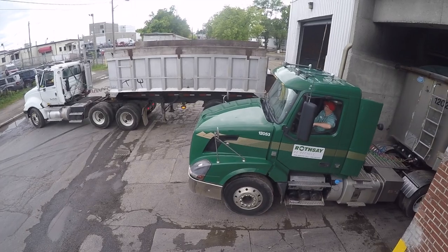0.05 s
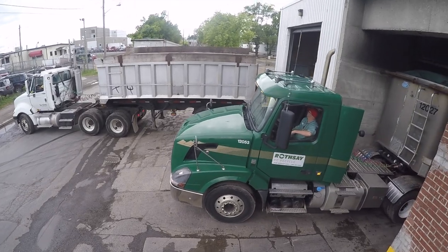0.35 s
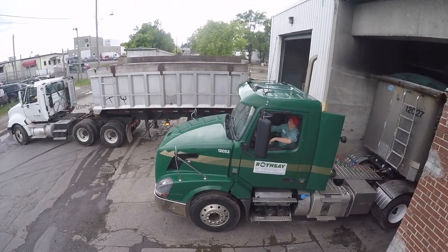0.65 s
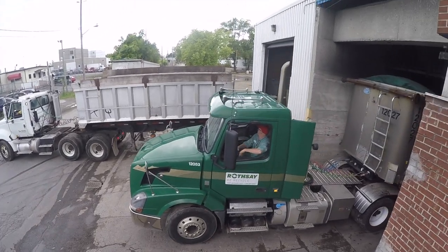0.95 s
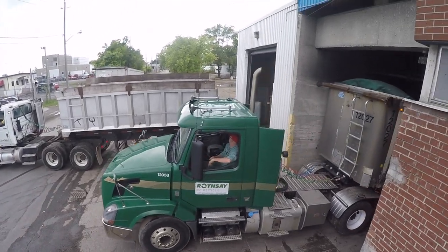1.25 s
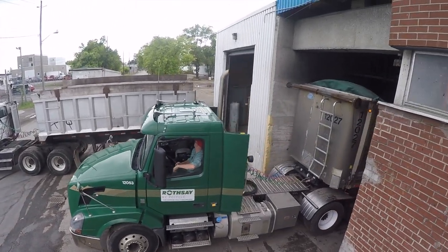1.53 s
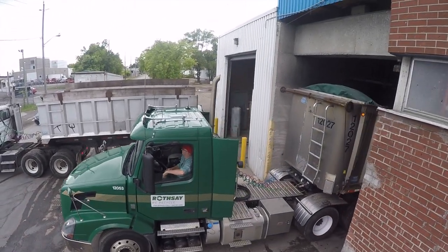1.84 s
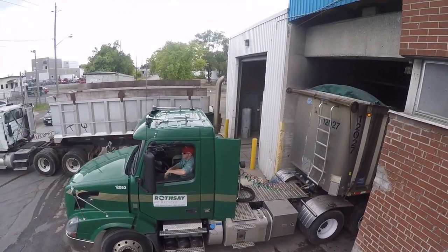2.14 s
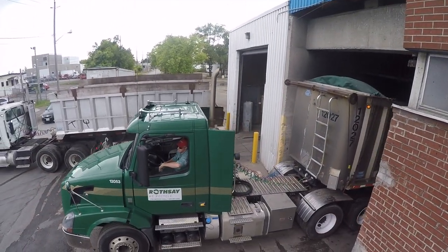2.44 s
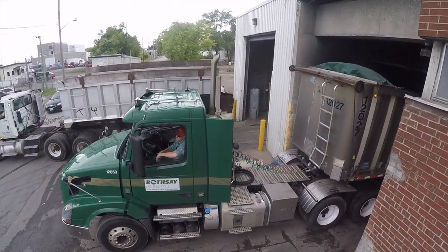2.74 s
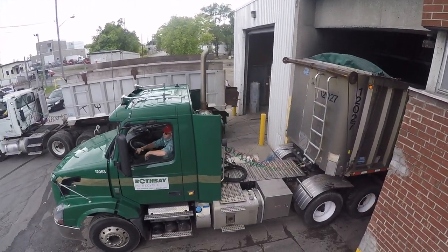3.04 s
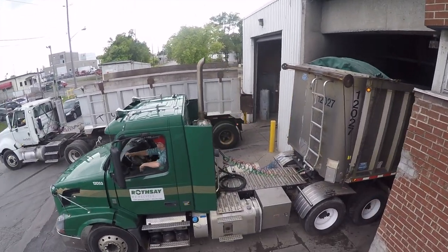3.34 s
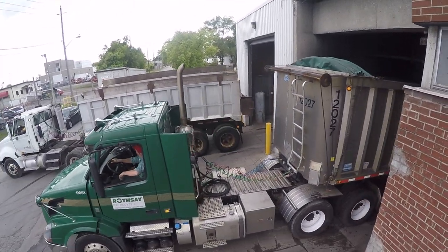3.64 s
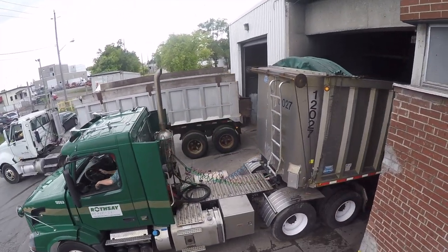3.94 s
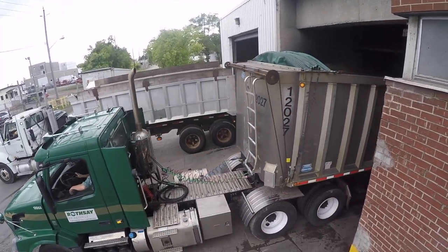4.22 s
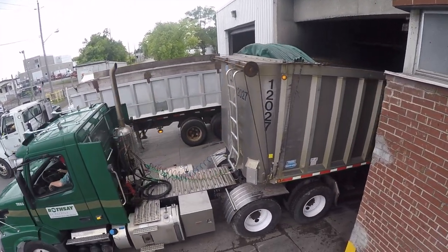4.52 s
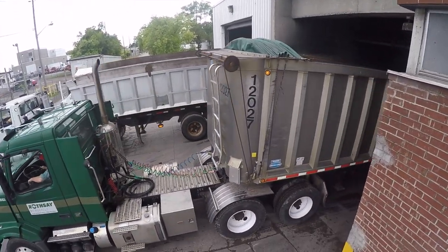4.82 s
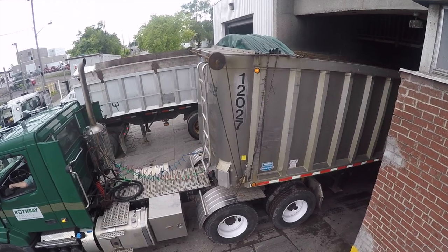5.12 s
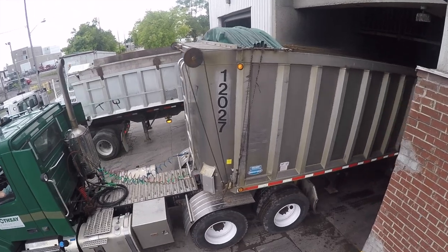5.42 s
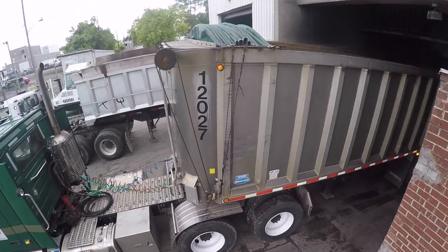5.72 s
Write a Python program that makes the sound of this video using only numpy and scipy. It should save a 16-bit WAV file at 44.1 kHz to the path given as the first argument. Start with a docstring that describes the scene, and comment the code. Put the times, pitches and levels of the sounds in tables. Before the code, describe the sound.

A heavy truck creeps out of a loading bay, heard from close by. Air hisses briefly over the rumbling, clattering diesel and a brake chatters. The dragging brakes then scrape and break into rough, wavering squeals with a short echo off the yard walls. A soft low thump and one hard knock come midway, followed by more chatter and squeals. These drop to a creak and grind before a last hiss of air as the engine swells.

```python
"""A heavy truck creeps out of a loading bay. Air hisses over the rumbling, clattering diesel, and a
brake shoe chatters. From 1 s the dragging brakes scrape, then stick and slip into rough, wavering
squeals that the yard walls throw back. A soft low thump comes, like a buffet of wind, then a hard
knock near 3 s; chatter and squeals return. From 4.5 s the brakes drop to a creak and a grind over the
humming drive line, and a last hiss of air comes as the engine swells."""
import sys
import numpy as np
from scipy import signal
from scipy.fft import rfft, irfft
from scipy.io import wavfile
from scipy.ndimage import uniform_filter1d

SR = 44100
rng = np.random.default_rng(int(sys.argv[2]) if len(sys.argv) > 2 else 0)


def store_wav(level_fs):
    """Save 16-bit WAV to argv[1]."""
    pcm = np.round(np.clip(np.atleast_2d(level_fs), -1, 1) * 32767)
    wavfile.write(sys.argv[1], SR, pcm.T.astype(np.int16))


N = 263277
TIME = np.arange(N) / SR
BINS = np.fft.rfftfreq(N, 1 / SR)
FIRING_HZ, TOP_HZ = 28.09, 15350  # the diesel's pulse; the high cut of the mix


def amp(db):
    """Decibels to gain."""
    return 10 ** (np.asarray(db) / 20)


def unit(x):
    """Scales to rms 1."""
    return x / np.sqrt(np.mean(x ** 2) + 1e-20)


def curves(rows):
    """One automation curve for each column after the time, in straight ramps."""
    times, *columns = np.transpose(rows)
    return [np.interp(TIME, times, column) for column in columns]


def noise(gain):
    """Noise of rms 1 with the given gain in each bin."""
    return unit(irfft(rfft(rng.standard_normal(N)) * gain, N))


def eq_noise(points):
    """Noise of rms 1 shaped by an EQ curve."""
    hz, db = np.transpose(points)
    return noise(amp(np.interp(np.log(BINS + 1), np.log(hz + 1), db)))


def drift(hz):
    """Random modulation of rms 1, rolling off above the given rate."""
    return noise(1 / (1 + (BINS / hz) ** 4))


def band(hz, width):
    """Noise ringing in one resonance."""
    return noise(1 / (1 + ((BINS - hz) / (0.55 * width)) ** 2))


def throb(hz, depth_db, wander):
    """Gain that jumps and dies away once a cycle, uneven in rate and depth."""
    turns = np.cumsum(hz * (1 + wander * drift(5.7))) / SR
    saw = uniform_filter1d(.5 - turns % 1, size=350)
    return unit(amp(depth_db * saw * (1 + .4 * drift(12))))


# the diesel's low bed, swelling as it pulls: t/s, level/dB
RUMBLE_LEVEL = [(0, -32), (.55, -32.5), (.8, -33.5), (1.2, -32), (1.8, -30), (2.2, -31), (2.65, -30.5),
                (2.9, -26.5), (3.25, -33), (3.65, -32), (4.4, -34.5), (4.95, -36), (5.25, -31),
                (5.5, -30.5), (5.68, -26), (5.97, -32.5)]
# its EQ, heavy in the sub bass: f/Hz, level/dB
RUMBLE_EQ = [(7.1, -30), (12, 2.5), (30, 4.5), (56, -2), (73, -6.5), (140, -29), (182, -24.5), (287, -39.5),
             (330, -52), (430, -100), (730, -120)]
def rumble(trim_db):
    """The deep rumble of the diesel pulling."""
    return amp(curves(RUMBLE_LEVEL)[0] + trim_db) * eq_noise(RUMBLE_EQ)


# exhaust tones: multiple of the firing rate, level/dB
EXHAUST_ORDERS = [(1, -45.5), (2, -39), (3.4, -54.5), (6.3, -65.5)]
def exhaust():
    """The slow-running diesel throbs at multiples of its firing rate."""
    turns = np.cumsum(FIRING_HZ * (1 + .06 * drift(4))) / SR
    return np.sqrt(2) * sum(amp(db + 2 * drift(2.7)) * np.sin(2 * np.pi * (order * turns + rng.random()))
                            for order, db in EXHAUST_ORDERS)


# roar of the block as the cab passes: t/s, level/dB
ROAR_LEVEL = [(0.06, -54.5), (0.32, -50), (1.34, -53), (1.82, -50.5), (3.2, -49), (4.65, -51), (5.18, -46),
              (5.48, -50), (5.97, -48)]
# its midrange EQ: f/Hz, level/dB
ROAR_EQ = [(160, -1), (270, -4), (313, -5), (355, -4.5), (442, -5), (594, -4.5), (674, -5.5), (1050, 1.5),
           (1310, -10.5), (1450, -3), (1880, -5), (3190, -120)]
def roar(trim_db):
    """The engine block's roar gives the diesel its body."""
    return amp(curves(ROAR_LEVEL)[0] + trim_db) * eq_noise(ROAR_EQ)


# clatter of the diesel as the cab passes: t/s, level/dB
CLATTER_RIDE = [(0, -44), (.33, -41.5), (1.0, -45.5), (1.9, -45.5), (2.25, -36), (2.45, -43.5), (2.7, -38),
                (3.3, -41), (4.45, -45), (5.25, -35), (5.45, -42), (5.97, -41)]
# its hard, bright EQ: f/Hz, level/dB
CLATTER_EQ = [(710, -68), (1200, -11), (1320, -22), (1790, -2), (2150, -6), (2490, 3), (2920, -11.5),
              (3800, -2.5), (4450, -35), (4890, -34), (5270, -29.5), (6940, -23.5), (8390, -41),
              (11200, -50), (15000, -40)]
# steady ringing of the metalwork: f/Hz, width/Hz, level/dB
METAL_RINGS = [(1054, 150, -68.5), (2672, 50, -59), (4770, 8.4, -60), (7000, 55, -85.5)]
def clatter():
    """The diesel's metallic edge: bright noise and ringing metalwork."""
    rattle = amp(curves(CLATTER_RIDE)[0]) * eq_noise(CLATTER_EQ)
    return rattle + sum(amp(db) * band(hz, width) for hz, width, db in METAL_RINGS)


# hum of the drive line: t/s, f/Hz, level/dB
DRIVE_HUM = [(4.3, 343.5, -79), (4.6, 340, -65), (4.8, 351, -55.5), (5.05, 357, -60.5), (5.25, 364, -48),
             (5.4, 360, -74), (5.7, 351, -74), (5.85, 346, -52.5), (5.97, 347, -49)]
def drive_line():
    """The drive line under load sings one wavering tone."""
    hz, db = curves(DRIVE_HUM)
    level = amp(db + 2.7 * drift(12.5))
    turns = np.cumsum(hz * (1 + 0.022 * drift(25.6))) / SR
    return np.sqrt(2) * level * np.sin(2 * np.pi * turns)


# puffs of air at the head and tail: t/s, hiss level/dB, whistle level/dB
AIR_LEVELS = [(0, -43, -59), (.2, -60, -55), (.32, -59, -75.5), (5.58, -68, -66.5), (5.64, -43, -60.5),
              (5.97, -48.5, -62)]
# EQ of the hiss: f/Hz, level/dB
HISS_EQ = [(2000, -1), (4000, 9.5), (6800, 2.5), (8800, -17), (11500, -15), (15000, -22)]
def air():
    """Compressed air escapes from the brake system: a hiss with a thin, breathy top."""
    hiss_db, whistle_db = curves(AIR_LEVELS)
    return amp(hiss_db) * eq_noise(HISS_EQ) + amp(whistle_db) * band(hz=10800, width=3500)


# lurches of the truck: t/s, level/dB
LURCHES = [(.225, -47), (1.62, -47), (3.14, -44), (3.25, -52), (3.86, -43.5), (4.27, -48), (5.64, -42.5)]
# EQ of the bodywork: f/Hz, level/dB
PANEL_EQ = [(150, -25), (330, -8), (700, -3), (1050, 2.5), (1310, -6), (1800, -9), (3200, -40)]
def shudders(rise_s, t60):
    """Each lurch shakes the panels into a short dull rattle."""
    shake = np.zeros(N)
    for start, db in LURCHES:
        t = np.maximum(TIME - start, 0)
        shake += np.minimum(t / rise_s, 1) * amp(db - 60 * np.maximum(t - rise_s, 0) / t60)
    return shake * eq_noise(PANEL_EQ)


# a soft low thump, then three modes that make one knock: t/s, f/Hz, t60/s, level/dB
THUMP_AND_KNOCK_MODES = [(2.325, 82.3, 0.15, -17), (2.974, 784, 0.014, -22), (2.976, 603, 0.014, -18.5),
                         (2.981, 81.5, 0.054, -10)]
def thump_and_knock():
    """A thump like a buffet of wind, then the trailer's one hard knock, all quickly damped rings."""
    out = np.zeros(N)
    for start, hz, t60, db in THUMP_AND_KNOCK_MODES:
        t = np.maximum(TIME - start, 0)
        attack = 1 - np.exp(-t * hz)
        out += attack * amp(db - 60 * t / t60) * np.sin(2 * np.pi * hz * t)
    return out


# light drag of the linings between grabs: t/s, level/dB
LINING_DRAG = [(0, -40), (.3, -44), (.7, -49), (3.1, -48.5), (5.97, -46)]
# the linings grab and let go: t/s, length/s, attack/s, release/s, level/dB
LINING_GRABS = [(1.376, 0.44, 0.17, 0.16, -37.5), (1.867, 0.48, 0.085, 0.1, -36),
                (2.07, .21, 0.06, .11, -33.5), (2.2, 0.67, 0.079, 0.48, -40.5),
                (3.17, 0.61, 0.25, 0.23, -39), (3.597, .85, 0.32, 0.2, -36.5),
                (4.477, 0.93, 0.2, 0.069, -35), (5.04, 0.24, 0.063, 0.067, -32.5),
                (5.578, 0.94, .09, 0.41, -40)]
# EQ of the scrape: f/Hz, level/dB
SCRAPE_EQ = [(710, -23), (1200, -15), (1330, -33), (1830, -11.5), (1990, -6), (2460, -12), (2880, -7.5),
             (3420, 2.5), (4310, -3), (4790, -6.5), (5210, -4.5), (6110, -13.5), (7710, -20.5), (9620, -30),
             (15000, -35)]
def scrape(trim_db):
    """Dense tiny slips of the linings, in clumps, swelling with each grab."""
    power = amp(curves(LINING_DRAG)[0]) ** 2
    for start, length, attack, release, db in LINING_GRABS:
        ramps = np.minimum((TIME - start) / attack, (start + length - TIME) / release)
        power += (amp(db) * np.clip(ramps, 0, 1)) ** 2
    clumps = unit(amp(.8 * drift(400) + 1.7 * drift(20)))
    return amp(trim_db) * np.sqrt(power) * clumps * eq_noise(SCRAPE_EQ)


# judder of a brake shoe: t/s, ring level/dB, grit level/dB
JUDDER_LEVELS = [(.22, -66, -80), (.24, -39.5, -57), (.45, -44.5, -60.5), (.62, -44, -63), (.8, -55, -68),
                 (1.05, -79, -67), (1.2, -86, -53), (3.12, -75, -97), (3.135, -43.5, -50.5),
                 (3.4, -43, -61), (3.55, -67.5, -67)]
# resonances of the shoe: f/Hz, width/Hz, relative level/dB
SHOE_MODES = [(4120, 480, 5.5), (6480, 270, -9.5), (7900, 400, -20)]
def chatter():
    """A shoe shaken by the engine rubs in quick bursts."""
    ring_db, grit_db = curves(JUDDER_LEVELS)
    ring = unit(sum(amp(db) * band(hz, width) for hz, width, db in SHOE_MODES))
    bursts = throb(FIRING_HZ, depth_db=14, wander=.08)
    return bursts * (amp(ring_db) * ring + amp(grit_db) * band(hz=6600, width=4500))


# harsh accents from the brakes: t/s, length/s, f/Hz, width/Hz, level/dB
BRAKE_CATCHES = [(1.505, .05, 3060, 200, -39), (1.535, 0.13, 2660, 200, -40), (2.23, 0.063, 1740, 250, -44),
                 (3.129, 0.074, 4640, 300, -33.5), (3.971, 0.053, 1846, 120, -41),
                 (3.987, 0.022, 4550, 300, -37), (4.142, 0.022, 4834, 700, -28.5),
                 (4.204, 0.047, 4750, 220, -33), (4.214, 0.053, 1900, 100, -42.5)]
def catches():
    """The brakes catch in brief screeches too rough to hold a pitch."""
    out = np.zeros(N)
    for start, length, hz, width, db in BRAKE_CATCHES:
        envelope = np.interp(TIME - start, [0, .006, length * 0.79, length], [0.026, 1, 1, 0])
        out += amp(db) * envelope * band(hz, width)
    return out


def yard(x, t60, wet_db):
    """Sparse echoes from ground, trailer and walls."""
    t = np.arange(SR // 2) / SR
    taps = rng.standard_normal(len(t)) * (rng.random(len(t)) < 1500 / SR)  # about 1500 echoes a second
    taps *= (t > .003) * amp(-60 * t / t60)
    echoes = signal.fftconvolve(x, taps / np.linalg.norm(taps))[:N]
    return (x + amp(wet_db) * echoes) / np.sqrt(1 + amp(2 * wet_db))


# resonances of the brake drum: f/Hz, width/Hz, send level/dB
DRUM_MODES = [(2583, 32, 9.5), (3720, 14, -23), (4727, 88, 2), (7310, 29, 2.5), (7700, 36, -3),
              (11440, 100, -7)]
def drum(x):
    """The drum rings on at its own modes when the rubbing passes them."""
    return x + sum(amp(db) * signal.lfilter(*signal.iirpeak(hz, hz / width, fs=SR), x)
                   for hz, width, db in DRUM_MODES)


# squeal timbres by name: rasp share (held to 0.05-0.9), relative level/dB of partials 1 to 6
BRAKE_VOICES = { "whistle": (0.26, 0.5, -1, -11.5, -20, -21, -27),
                "hollow": (0.2, -3.5, 0, -12, -19.5, -35.5, -36.5),
                "screech": (0.1, -18, -13, 3.5, 0, -15, -17), "shriek": (0.8, -17, 1.5, 4.5, -31, -24, -42),
                "bright": (.28, 2, 1, -7, -16, -27, -25), "octave": (-0.2, -22, 13, -14, -20, -25, -22),
                "hoarse": (1, 4.5, 0, -15, -22, -32, -34), "piercing": (-0.1, 5.5, -5, -12, -29, -26, -28),
                "pure": (-0.1, 3, -15, -32, -29, -40, -40), "creak": (0.8, -26, -11.5, 8, -1.5, -13.5, -23),
                "grind": (.9, -14, -6, -3, 1, -28, -26), }
def stick_slip(hz, voice):
    """A lining sticks and slips along a pitch curve: trembling partials, each in a skirt of rasp."""
    count = len(hz)
    rasp, *partials_db = BRAKE_VOICES[voice]
    rasp = np.clip(rasp, .05, .9)
    hops = np.tanh(4 * drift(28)[:count])  # the pitch hops between neighbouring modes
    tremble = .0075 * drift(500)[:count] + .006 * drift(90)[:count] + .01 * hops
    turns = np.cumsum(hz * (1 + tremble)) / SR
    upper_db = partials_db[-1] - 5.5 * np.arange(1, 4)  # partials 7 to 9 roll off
    partials = amp(np.r_[partials_db, upper_db])
    # uneven grip shakes the size and timing of every partial; the high ones come and go
    skirt = signal.hilbert(noise(1 / (1 + (BINS / 170) ** 2)))
    patches = drift(23.5)
    stack = np.zeros(count)
    for k, gain in enumerate(partials / np.linalg.norm(partials), 1):
        above, below, patch = (np.roll(v, rng.integers(N))[:count] for v in (skirt, skirt, patches))
        grip = np.sqrt(1 - rasp) + np.sqrt(rasp) * (above + below.conj()) / 2
        flicker = unit(amp(patch * np.minimum(k * hz / 1900, 6)))
        tone = (grip * np.exp(2j * np.pi * k * turns)).real
        stack += gain * flicker * (k * hz < TOP_HZ) * tone
    return np.sqrt(2) * stack


# squeal cues: t/s, length/s, crest as share of length, level/dB, first, middle and last f/Hz, voice
SQUEAL_CUES = [ (1.09, 0.15, 0.59, -43.5, 2350, 2353, 2577, "whistle"),
               (1.19, 0.22, 0.65, -34, 2570, 2428, 2112, "whistle"),
               (1.39, .13, .6, -33.5, 2450, 2430, 2606, "whistle"),
               (1.495, 0.098, .3, -40.5, 3120, 2924, 2740, "whistle"),
               (1.56, 0.092, 0.76, -51, 2850, 2770, 2660, "whistle"),
               (1.55, 0.12, 0.51, -35.5, 2020, 1887, 1796, "hollow"),
               (1.915, .12, 0.39, -31.5, 1164, 1197, 1277, "screech"),
               (2.0, 0.1, 0.69, -32.5, 1240, 1287, 1302, "screech"),
               (2.07, .22, .36, -29.5, 1652, 1650, 1865, "shriek"),
               (2.25, .21, 0.44, -35, 1810, 2107, 2247, "bright"),
               (2.43, 0.29, 0.21, -39, 2250, 2320, 2330, "bright"),
               (2.31, 0.093, 0.71, -41, 1520, 1530, 1630, "octave"),
               (2.43, 0.11, 0.57, -35, 1750, 1816, 1783, "octave"),
               (3.17, 0.31, 0.42, -38.5, 2330, 2205, 1998, "hoarse"),
               (3.46, .11, 0.38, -35.5, 2086, 2000, 1968, "hollow"),
               (3.55, .24, 0.53, -33, 1973, 1999, 1763, "hollow"),
               (3.73, .17, 0.11, -36.5, 1900, 1762, 1704, "hollow"),
               (3.961, .125, 0.32, -30.5, 2750, 2600, 2480, "octave"),
               (4.035, 0.1264, 0.54, -33, 2570, 2630, 2480, "piercing"),
               (4.081, 0.21, 0.21, -34, 3387, 3277, 3266, "pure"),
               (4.195, 0.0655, 0.38, -33, 2430, 2380, 2310, "octave"),
               (4.55, .26, 0.82, -29.5, 1091, 1140, 1212, "creak"),
               (4.79, .26, 0.28, -37, 1193, 1240, 1222, "grind"),
               (5.06, 0.142, 0.31, -30.5, 1175, 1182, 1180, "grind"),
               (5.16, .21, .45, -32.5, 1195, 1199, 1208, "grind"), ]
def squeals(swell_db):
    """The brakes sing out: each squeal glides on one arc, swells to its crest and fades."""
    out = np.zeros(N)
    for start, length, crest, db, *pitches, voice in SQUEAL_CUES:
        progress = np.linspace(0, 1, round(length * SR))
        hz = np.polyval(np.polyfit([0, .5, 1], pitches, 2), progress)
        sag_db = swell_db * np.interp(progress, [0, crest, 1], [1, 0, 1]) ** 1.38
        envelope = amp(db - sag_db) * signal.windows.tukey(len(progress), .12)
        out += np.pad(envelope * stick_slip(hz, voice), (round(start * SR), N))[:N]
    return out


def scene():
    """Mono mix: brakes up front, the diesel underneath, its roar and clatter pulsing with the firing."""
    echoing = yard(squeals(swell_db=10.5), t60=.2, wet_db=-4.5)
    rubbing = amp(0.55) * echoing + scrape(trim_db=-1.5)
    brakes = drum(rubbing) + catches() + chatter()
    firing = throb(FIRING_HZ, depth_db=2, wander=0.033)
    diesel = rumble(trim_db=1) + firing * (roar(trim_db=1.5) + clatter()) + exhaust()
    bumps = shudders(rise_s=0.024, t60=0.48) + thump_and_knock()
    return (diesel + drive_line() + air() + bumps + brakes)[None]


def record(dry):
    """A moment of silence, a fast fade-in and a steep high cut."""
    fade_in = np.clip((TIME - .036) / .012, 0, 1)
    high_cut = signal.firwin(511, TOP_HZ, window=("kaiser", 9), fs=SR)
    return signal.oaconvolve(dry * fade_in, high_cut[None], "same")


dry = scene()
out = record(dry)
store_wav(out)
```